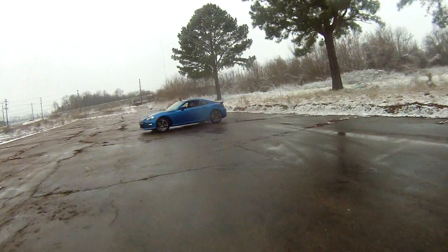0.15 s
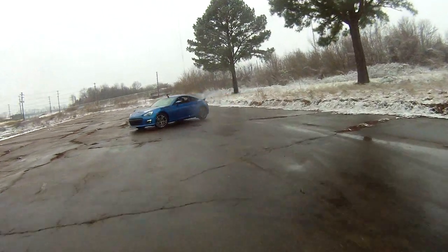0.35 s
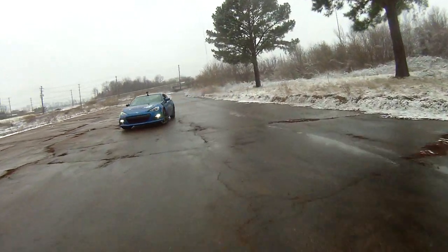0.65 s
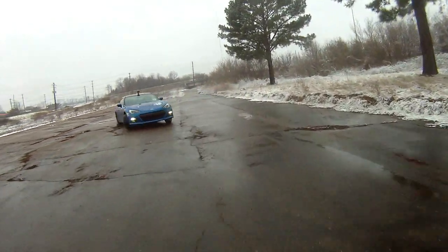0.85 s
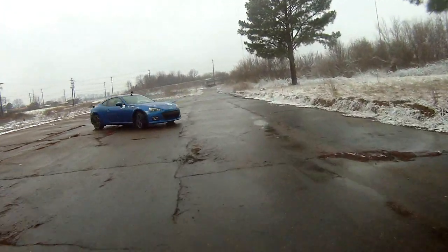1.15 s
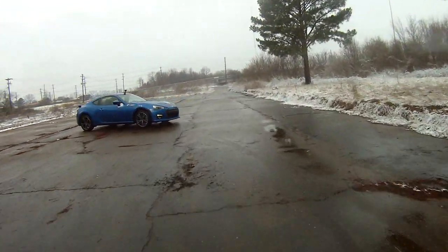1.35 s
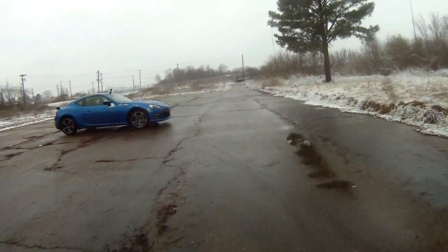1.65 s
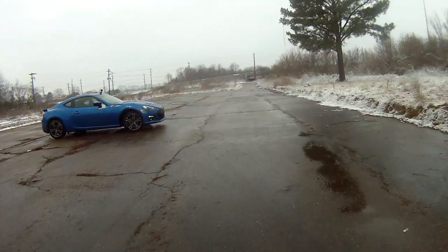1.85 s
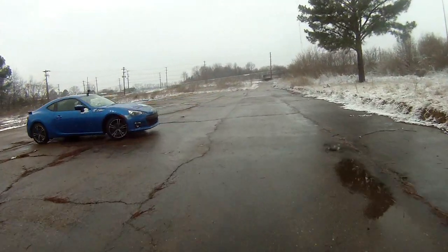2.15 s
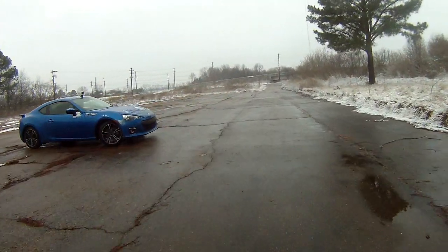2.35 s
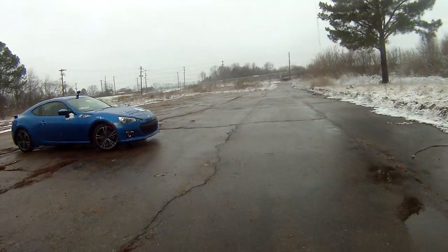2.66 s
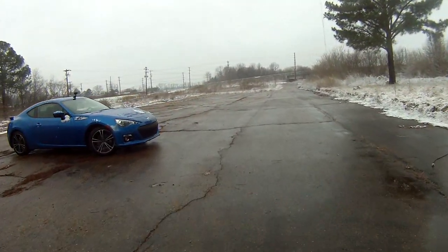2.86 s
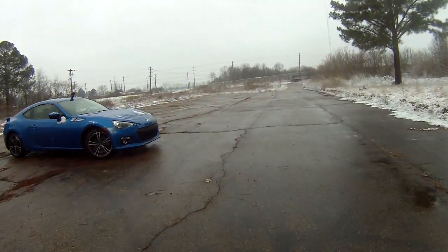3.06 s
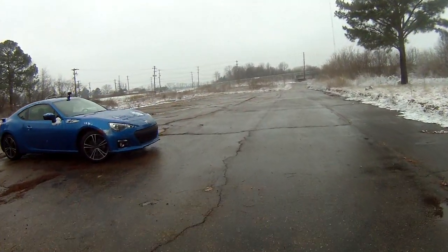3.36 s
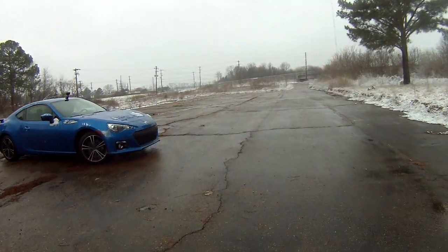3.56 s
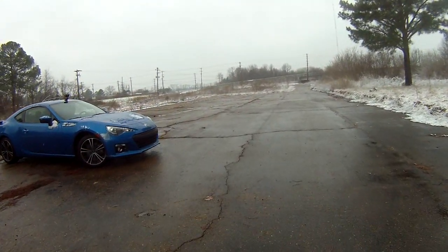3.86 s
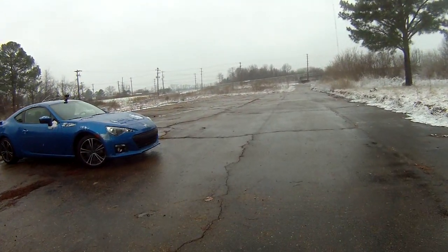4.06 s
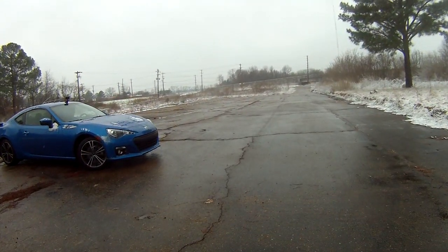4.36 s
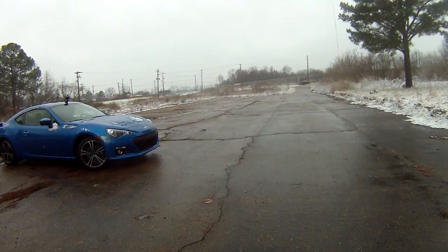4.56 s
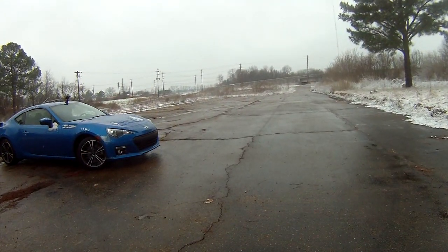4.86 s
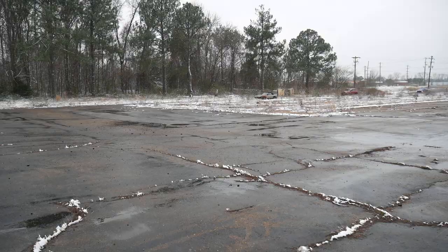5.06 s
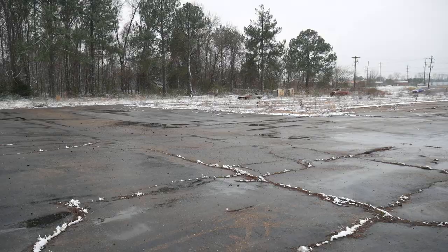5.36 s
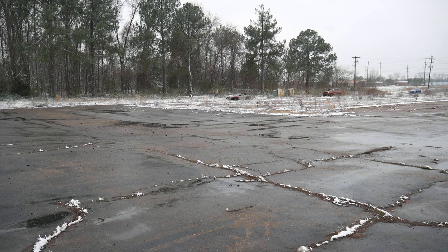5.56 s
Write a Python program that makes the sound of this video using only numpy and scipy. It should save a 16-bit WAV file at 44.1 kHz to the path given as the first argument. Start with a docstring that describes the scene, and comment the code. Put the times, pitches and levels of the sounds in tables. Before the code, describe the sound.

Buffeting wind and bright wet spray give way to a low, uneven car engine drone, abruptly replaced by soft stereo wind.

```python
"""On wet asphalt, a small action camera on a rumbling carrier hears wind, spray and a car engine close by.
Shaped noise makes wind, spray and air; short pulses are wind thumps; unevenly paired firings make the drone.
A gain control rides the mono mix, which is stored at 12 kHz and played back in steps.
A hard cut leads to a second, stereo camera with only light wind: shaped mid and side noise, over faint hiss."""
import sys
import numpy as np
from scipy import signal
from scipy.fft import rfft, irfft
from scipy.io import wavfile

SR = 44100
rng = np.random.default_rng(int(sys.argv[2]) if len(sys.argv) > 2 else 0)


def wav_record(signal):
    """Record a signal, one row per channel, as 16-bit PCM in the file named by sys.argv[1]."""
    frames = np.transpose(np.atleast_2d(signal))
    bounded = np.clip(frames, -1, 1)
    # unit amplitude maps onto the largest positive 16-bit level
    quanta = np.round(bounded * 32767).astype(np.int16)
    wavfile.write(sys.argv[1], SR, quanta)


N = 252252
CUT_S = 5.1671   # hard cut to the second camera


def from_db(db):
    """Decibels to gain."""
    return 10 ** (np.asarray(db) / 20)


def rms_one(x):
    """Scale to unit rms."""
    return x / np.sqrt(np.mean(x ** 2) + 1e-20)


def in_time(rows):
    """Each column of a time curve, one value a sample."""
    s, *columns = np.transpose(rows)
    return [np.interp(np.arange(N) / SR, s, column) for column in columns]


def at_hz(points, hz):
    """Read a spectrum on a log-frequency axis."""
    table_hz, table_db = np.array(points).T
    return np.interp(np.log(hz), np.log(table_hz), table_db)


def spectrum_gain(spectrum):
    """A dB spectrum as gain on the FFT bins."""
    hz = np.maximum(np.fft.rfftfreq(N, 1 / SR), 1)
    return from_db(at_hz(spectrum, hz))


def filtered(x, spectrum):
    """Apply a dB-over-Hz table as a filter without delay."""
    return irfft(rfft(x) * spectrum_gain(spectrum), N)


def colour(x, spectrum, low_hz, high_hz):
    """Shape noise to a spectrum; the band from low to high gets rms 1."""
    hz = np.fft.rfftfreq(N, 1 / SR)
    shaped = rfft(x) * spectrum_gain(spectrum)
    band = irfft(shaped * (hz > low_hz) * (hz < high_hz), N)
    return irfft(shaped, N) / np.sqrt(np.mean(band ** 2))


def drift(rate_hz):
    """Slow random wander of spread 1: noise through a double pole at the rate."""
    step = 20   # computed on every 20th sample, then interpolated
    r = np.exp(-2 * np.pi * rate_hz * step / SR)
    noise = rng.standard_normal(N // step + 4002)
    slow = signal.lfilter([1], [1, -2 * r, r * r], noise)[4000:]   # settled part only
    return np.interp(np.arange(N) / step, np.arange(len(slow)), rms_one(slow - slow.mean()))


def eddies(spread_db, rate_hz):
    """Turbulence: white noise whose strength wanders by a spread in dB."""
    return rng.standard_normal(N) * from_db(spread_db * drift(rate_hz))


def resonance(x, hz, width_hz):
    """Two-pole band, gain about 1 on top."""
    r = np.exp(-np.pi * width_hz / SR)
    b = np.array([1, 0, -1]) * (1 - r * r) / 2
    return signal.lfilter(b, [1, -2 * r * np.cos(2 * np.pi * hz / SR), r * r], x)


def wind_buffet(buffet_db):
    """Large slow eddies press on the microphone as deep lumpy bass."""
    # buffeting colour: f/Hz, level/dB
    deep = [(6, -22), (15, 1), (30, 2), (55, 10.5), (80, -3), (120, -17), (250, -55.5)]
    return from_db(buffet_db) * colour(eddies(2.7, 12.0), deep, 21, 79)


def wind_flutter(wind_db, buffet_db):
    """Upper-bass turbulence that follows both wind and buffeting, less than dB for dB."""
    # flutter colour: f/Hz, level/dB
    upper_bass = [(30, -28), (60, -1.5), (100, 3), (170, -2.5), (250, -8.5), (400, -29), (800, -52)]
    flutter_db = -21.5 + .62 * (wind_db + 30) + .3 * (buffet_db + 25)
    return from_db(flutter_db) * colour(eddies(2.7, 14.6), upper_bass, 103.5, 230)


def wind_roar(wind_db):
    """Smaller, faster eddies roar in the low mids with each gust."""
    # roar colour: f/Hz, level/dB
    low_mids = [(60, -36), (150, -2.5), (300, -3), (600, -10.5), (1200, -20.5), (2400, -28.5), (5000, -67)]
    return from_db(wind_db) * colour(eddies(2.12, 63), low_mids, 337, 890)


def wind_thumps():
    """A slug of air pushes the membrane one way, with a small swing back on both sides."""
    # thumps: t/s, signed strength, width/ms
    slugs = [(0.139, -1.08, 2.1), (0.315, -0.51, 0.83), (0.392, 0.99, 2.1), (0.52, 1, 1.3),
             (0.879, 0.71, 1.45), (0.954, -0.88, 2.1), (1.019, 0.61, 0.92), (1.161, -1.23, 2.3),
             (1.315, -1.55, 0.95), (1.345, -1.8, 1.17), (1.348, 1, 2.8), (1.495, -0.93, 2.5),
             (1.65, 0.94, 1.8), (1.786, -0.41, 5), (1.845, 0.64, 3), (3.465, -0.79, 1.4)]
    t = np.arange(N) / SR
    out = np.zeros(N)
    for s, strength, width_ms in slugs:
        near = slice(round((s - .03) * SR), round((s + .03) * SR))
        u = (t[near] - s) / (width_ms / 1000)
        push = np.exp(-u ** 2)
        swing_back = .28 * np.exp(-(u / 3) ** 2)
        out[near] += strength * (push - swing_back) / 1.046
    return out


def wind_puffs():
    """Short puffs across the microphone: noise let in and out quickly."""
    # puffs: t/s, level/dB, length/s
    bursts = [(0.301, -23, 0.019), (0.967, -29, .03), (1.304, -19.5, 0.038), (1.432, -27, 0.0214),
              (1.459, -28, 0.013), (1.605, -36.5, 0.05), (2.707, -41, 0.023), (3.189, -32.5, 0.023),
              (3.42, -29.5, 0.0547), (3.97, -44, 0.018), (4.893, -38, 0.02)]
    # puff colour: f/Hz, level/dB
    puff_spectrum = [(60, -41), (200, 0.5), (500, -3), (1100, -11.5), (1600, -21), (3000, -47)]
    edge_s = .003
    t = np.arange(N) / SR
    gain = np.zeros(N)
    for s, db, length_s in bursts:
        inside_s = np.minimum(t - s, s + length_s - t)   # distance to the nearer end
        gain += from_db(db) * np.clip(inside_s / edge_s, 0, 1)
    return gain * colour(eddies(1.6, 82), puff_spectrum, 370, 830)


def rush(wind_db, beat, level):
    """Airy noise rises with wind and engine, breathes with the firings and rings in the engine bay."""
    # rush colour: f/Hz, level/dB
    airy = [(300, 7), (700, -1), (1200, 5), (1600, -1), (2000, -11), (3000, -14.5), (4500, -26),
            (5800, -36)]
    # engine bay resonances: f/Hz, width/Hz, level/dB
    bay = [(1180, 95, -18), (2456, 65, 4), (3172, 73, 8), (4930, 73, 6)]
    hiss = eddies(.8, 22) * from_db(2.1 * beat)
    ringing = sum(from_db(db) * resonance(hiss, hz, width_hz) for hz, width_hz, db in bay)
    gust_db = -41 + 1.18 * (wind_db + 30)   # rises faster than the wind
    gust = from_db(gust_db + 2.7 * drift(20))
    bay_level = level * from_db(-21)
    return np.hypot(gust, bay_level) * colour(hiss + ringing, airy, 714, 1900)


def spray():
    """Treble hiss, tyre spray and air as one bright noise."""
    # strength of the treble: t/s, level/dB
    treble = [(0.0, -50.5), (0.13, -42.5), (0.22, -49.5), (0.35, -40.5), (0.5, -49.5), (0.72, -43),
              (1.05, -50.5), (1.15, -45.5), (1.345, -47.5), (1.36, -75), (1.45, -56), (1.55, -56),
              (2.001, -42.5), (2.045, -45), (2.07, -40.5), (2.11, -35.5), (2.15, -45.5), (2.22, -50),
              (2.33, -59), (2.62, -52.5), (2.86, -59), (3.3, -57), (3.5, -58), (5.17, -61)]
    # spray colour: f/Hz, level/dB
    bright = [(800, -6.5), (1800, -1.5), (2600, -0.5), (3600, -1.5), (5000, -3.5), (5800, -8)]
    spray_db, = in_time(treble)
    return from_db(spray_db) * colour(eddies(2.1, 83), bright, 3490, 4980)


def engine():
    """Two uneven firings a cycle ring the exhaust; returns the drone, the firing beat 0-1 and the level as gain."""
    # engine run: t/s, cycles per second/Hz, level/dB
    run = [(1.0, 33, -31), (1.14, 31.2, -23.5), (1.33, 31.1, -24.5), (1.42, 30.5, -36.5), (1.86, 28.1, -29),
           (1.93, 28.0, -23), (2.11, 27.6, -21), (2.3, 29.8, -21), (2.42, 30.3, -20.5), (2.7, 27.1, -20.2),
           (3.0, 28.2, -20), (3.29, 27.3, -20.5), (3.58, 26.0, -21.5), (3.68, 25.7, -19.5),
           (4.12, 25.4, -19), (4.54, 25.3, -20), (4.93, 25.2, -22.5), (5.17, 25.15, -19.5)]
    # harmonics: multiple of the cycle, level/dB
    orders = [(1, -30), (2, -15), (3, -7), (4, -6), (5, -1.5), (6, -7), (7, -8.5), (8, -35.5), (9, -15.5),
              (10, -18.5), (11, -19.5), (12, -25.5), (13, -51.5), (14, -32), (15, -53)]
    # colour of pipe and body: f/Hz, level/dB
    pipe = [(60, 0), (90, 3.5), (120, 4), (155, 2.5), (185, -7), (213, -1.5), (240, 2.5), (300, -4.5)]
    second_firing = .5625   # share of the cycle after the first firing
    cycle_at_cut = .205   # share of the cycle on which the cut falls
    exhaust_hz, exhaust_width_hz = 115.7, 70
    whine_order, whine_db = 58.9, -31   # multiple of the cycle; below the engine's level
    per_s, level_db = in_time(run)
    turns = np.cumsum(per_s) / SR
    cycle = 2 * np.pi * (turns - turns[round(CUT_S * SR)] + cycle_at_cut)
    out = 0
    for k, db in orders:
        hz = k * per_s
        pair = np.angle(1 + np.exp(-2j * np.pi * k * second_firing))   # phase of the two firings together
        lag = np.arctan(2 * (hz - exhaust_hz) / exhaust_width_hz)   # phase turns across the resonance
        gain = from_db(db + at_hz(pipe, hz) + .7 * drift(4))
        out = out + gain * np.cos(k * cycle + pair - lag + .1 * drift(4))
    whine = np.sin(whine_order * cycle + .9 * drift(6.4))   # a belt-driven part, slightly unsteady
    out = out + from_db(whine_db + 2.5 * drift(18)) * whine
    fade_in = np.clip((np.arange(N) / SR - run[0][0]) / .023, 0, 1)
    level = fade_in * from_db(level_db)
    beat = fade_in * (.5 + .5 * np.cos(2 * cycle - 1.2))   # two swells a cycle
    return np.sqrt(2) * level * out, beat, level


def whistle():
    """A faint wavering tone: noise through two equal narrow resonances."""
    # whistle strength: t/s, level/dB
    tone = [(2.8, -78), (2.92, -51.5), (3.5, -61), (4.0, -85)]
    hz, width_hz = 2575, 30
    whistle_db, = in_time(tone)
    once = resonance(rng.standard_normal(N), hz, width_hz)
    return from_db(whistle_db) * rms_one(resonance(once, hz, width_hz))


def first_camera():
    """Wind, engine and car noise add up in one microphone."""
    # gusts past the microphone, as the strength of their roar: t/s, level/dB
    gusts = [(0.0, -24.5), (0.14, -23.5), (0.16, -24.5), (0.29, -25.5), (0.32, -20.5), (0.39, -22),
             (0.45, -24.5), (0.6, -23.5), (0.67, -24.5), (0.73, -22), (0.82, -33.5), (0.97, -27),
             (1.09, -40.5), (1.16, -28.5), (1.22, -32.5), (1.34, -31), (1.362, -36.5), (1.41, -33),
             (1.45, -33), (1.49, -40), (1.56, -41), (1.66, -37.5), (1.8, -40), (2.6, -41.5), (3.27, -36.5),
             (3.36, -42.5), (4.3, -46), (4.8, -40.5), (5.17, -43.5)]
    # deep buffeting, which comes and goes more slowly: t/s, level/dB
    buffeting = [(0.0, -32), (0.2, -21.5), (0.45, -41), (0.8, -19.5), (1.2, -24), (1.33, -20.5),
                 (1.5, -23.5), (1.8, -20.5), (2.1, -22), (2.25, -18.5), (2.35, -24), (2.6, -26),
                 (2.85, -23), (3.15, -27.5), (3.4, -21), (3.7, -34), (4.2, -36.5), (4.8, -21.5),
                 (5.17, -26.5)]
    wind_db, = in_time(gusts)
    buffet_db, = in_time(buffeting)
    drone, beat, level = engine()
    wind = wind_buffet(buffet_db) + wind_flutter(wind_db, buffet_db) + wind_roar(wind_db)
    wind = wind + wind_thumps() + wind_puffs()
    return wind + rush(wind_db, beat, level) + spray() + drone + whistle()


def gain_control(x, knee_db, release_db_per_s):
    """Peaks over the knee pull the gain down within milliseconds; it climbs back steadily in dB."""
    ramp = release_db_per_s * np.arange(N) / SR
    over = np.maximum(20 * np.log10(np.abs(x) + 1e-9) - knee_db, 0)
    cut_db = np.maximum.accumulate(over + ramp) - ramp
    smooth_db = signal.lfilter([.003], [1, -.997], cut_db)   # about 8 ms
    return x * from_db(-smooth_db)


def stepped_playback(x):
    """Stored at 12 kHz, each sample held for four steps at 48 kHz: mirror images appear around 12 kHz."""
    store_edge_hz, playback_edge_hz = 5590, 15300
    x = signal.sosfilt(signal.butter(8, store_edge_hz, fs=SR, output="sos"), x)
    stored = signal.resample_poly(x, 40, 147)
    held = np.repeat(stored, 4)
    steps = signal.resample_poly(held, 147, 160)[:N]
    return signal.sosfilt(signal.ellip(12, .3, 60, playback_edge_hz, fs=SR, output="sos"), steps)


def breeze(low_db):
    """Light wind in one channel; its crackle rises faster than its rumble."""
    # rumble colour: f/Hz, level/dB
    rumble_spectrum = [(24, -76.5), (40, -23.5), (236, -2.5), (283, -4.5), (446, -10.5), (527, -15),
                       (806, -22.5), (1500, -63), (1950, -83.5), (3300, -120)]
    # crackle colour: f/Hz, level/dB
    crackle_spectrum = [(500, 1.5), (1000, 2.5), (2000, -14.5), (4000, -34.5), (8000, -60), (15000, -59)]
    crackle_db = -53.5 + 1.73 * (low_db + 28)
    rumble = from_db(low_db) * colour(eddies(2.0, 35), rumble_spectrum, 100, 800)
    crackle = from_db(crackle_db) * colour(eddies(4.3, 80), crackle_spectrum, 1130, 4000)
    return rumble + crackle


def second_camera():
    """Light wind on a microphone pair, strongest out of phase near 1 kHz, without the deepest bass."""
    # wind strength: t/s, level/dB
    strength = [(5.168, -26.5), (5.184, -28), (5.205, -24), (5.29, -23), (5.35, -30.5), (5.42, -27.5),
                (5.46, -31), (5.5, -28.5), (5.56, -28.5), (5.63, -27.5), (5.67, -30), (5.7, -19),
                (5.72, -29.5)]
    # side minus mid: f/Hz, level/dB
    side_balance = [(60, -5), (110, -5), (200, -9.5), (380, 1), (700, 9), (1290, 9), (2380, 4), (4400, -1),
                    (8120, -4), (15000, -3)]
    # left minus right: f/Hz, level/dB
    left_balance = [(60, -3), (110, 3.5), (200, 3.5), (380, -5.5), (700, -2.5), (1290, -3), (2380, -4.5),
                    (4400, -1), (8120, -1), (15000, -2)]
    low_db, = in_time(strength)
    mid = breeze(low_db)
    side = filtered(breeze(low_db), side_balance)
    half = np.array(left_balance) * [1, .5]   # half the difference to each channel
    left = filtered(mid + side, half)
    right = filtered(mid - side, half * [1, -1])
    return signal.sosfilt(signal.butter(3, 79, "high", fs=SR, output="sos"), np.array([left, right]))


def preamp_hiss():
    """Faint white noise, independent in each channel."""
    return from_db(-74) * rng.standard_normal((2, N))


def scene():
    """The two shots joined by a hard cut."""
    first = stepped_playback(gain_control(first_camera(), knee_db=-4.5, release_db_per_s=45))
    second = second_camera() + preamp_hiss()
    return np.where(np.arange(N) < CUT_S * SR, first, second)


def record(dry):
    """The top above 15.7 kHz is cut, then full scale clips."""
    top_cut = signal.ellip(12, .3, 80, 15700, fs=SR, output="sos")
    return np.clip(signal.sosfilt(top_cut, dry), -1, 1)


dry = scene()
out = record(dry)
wav_record(out)
```